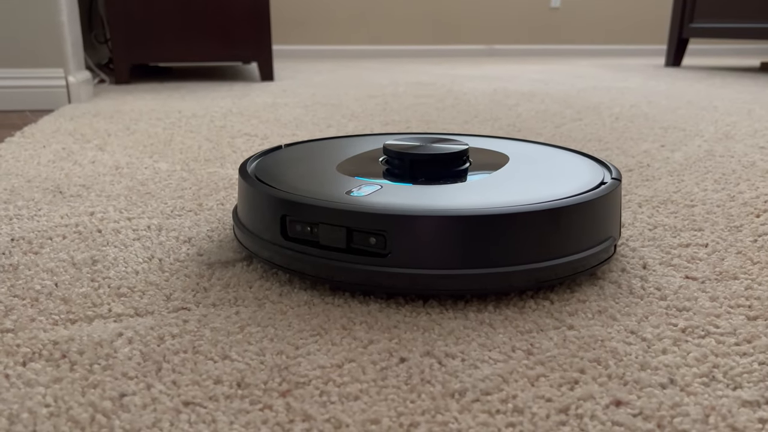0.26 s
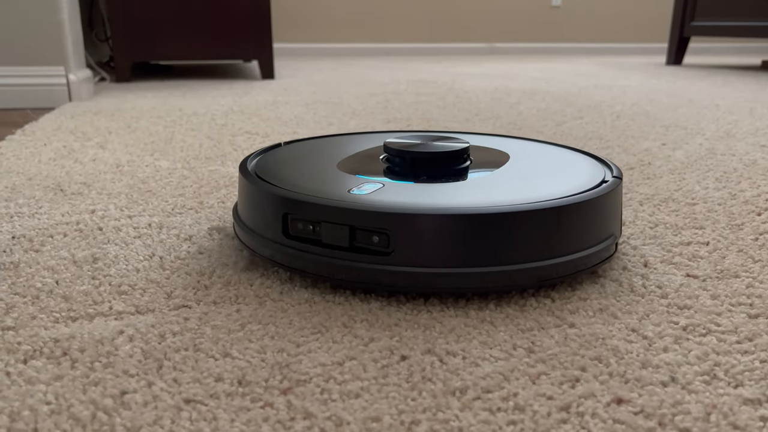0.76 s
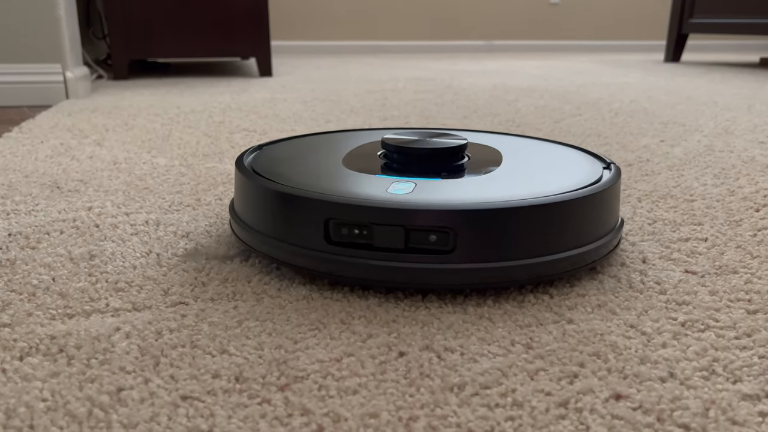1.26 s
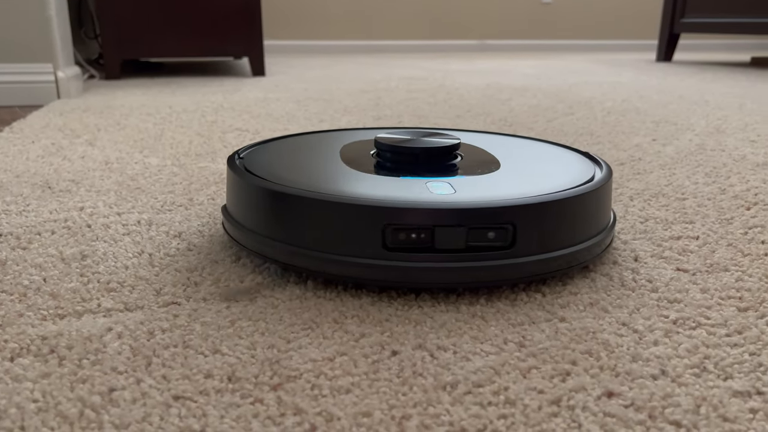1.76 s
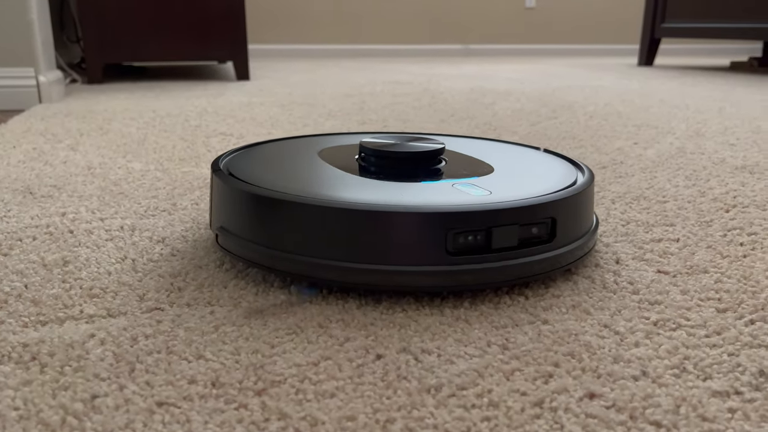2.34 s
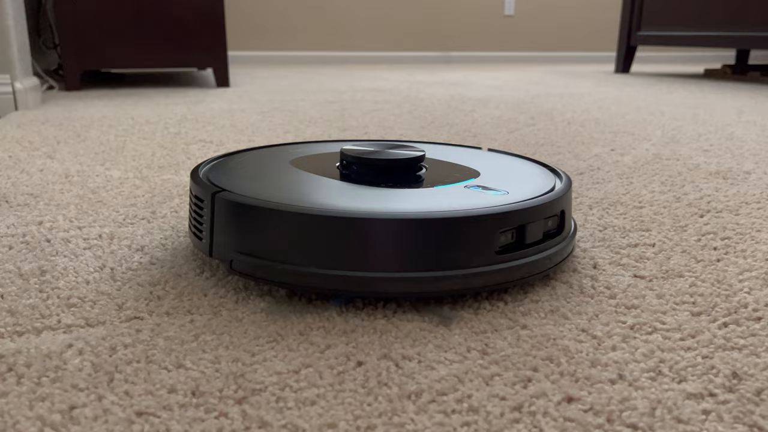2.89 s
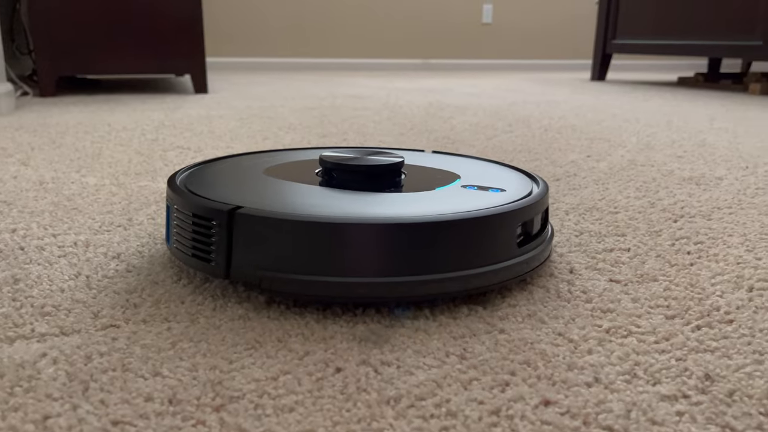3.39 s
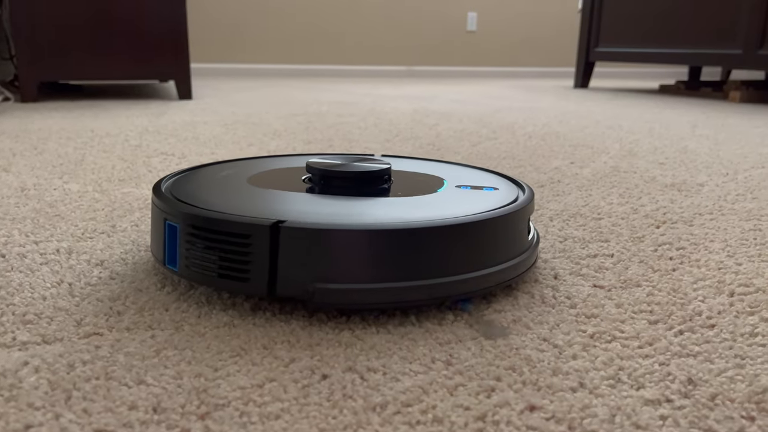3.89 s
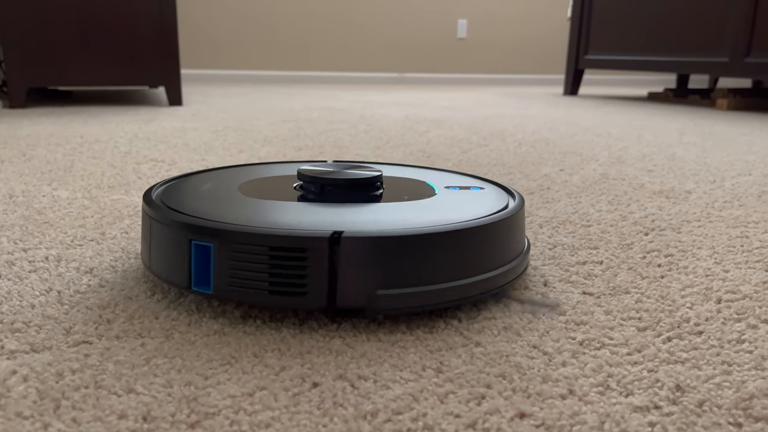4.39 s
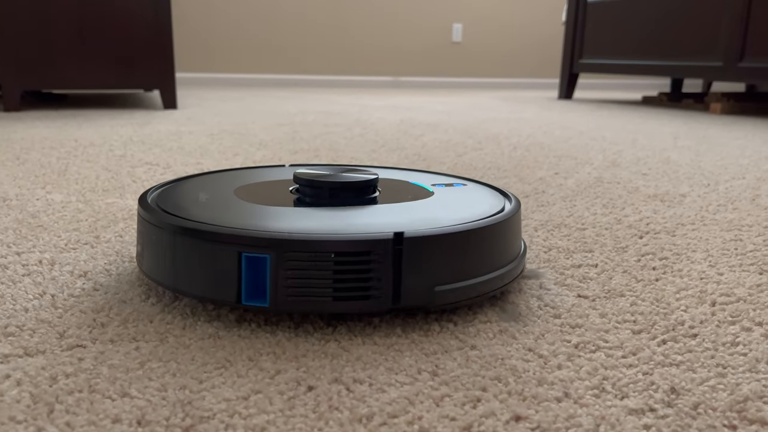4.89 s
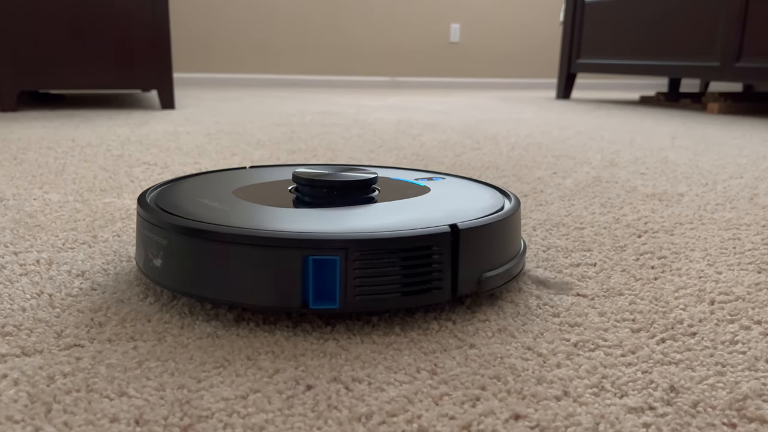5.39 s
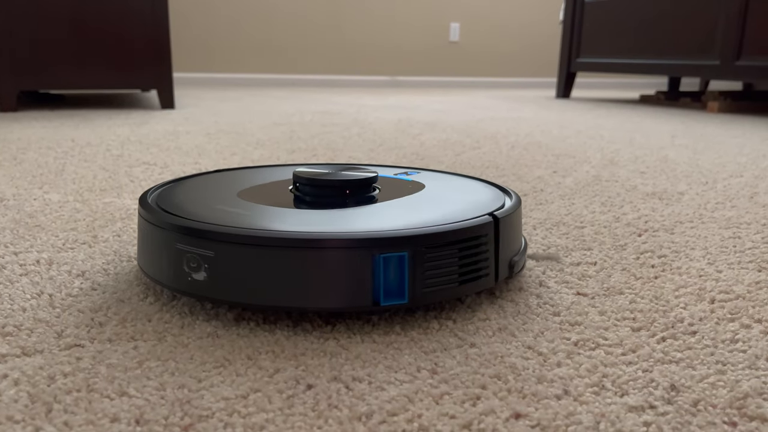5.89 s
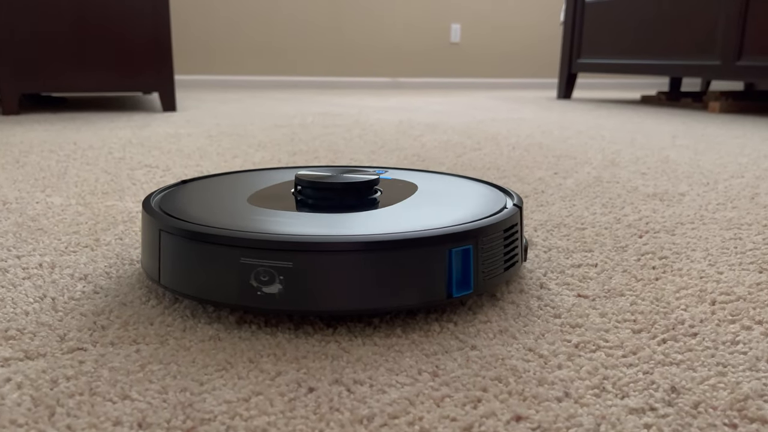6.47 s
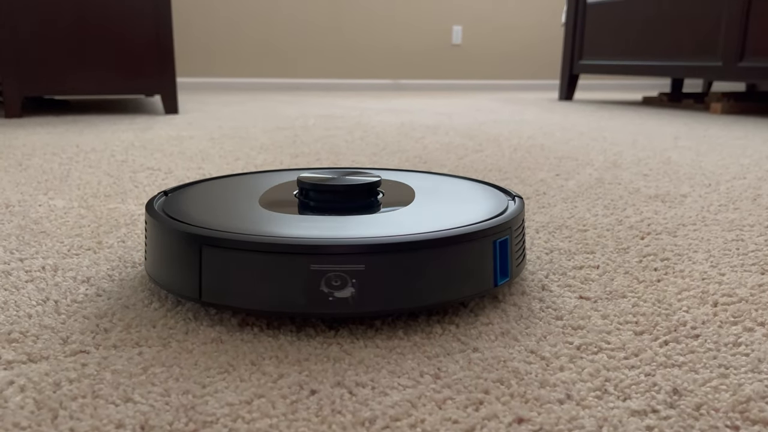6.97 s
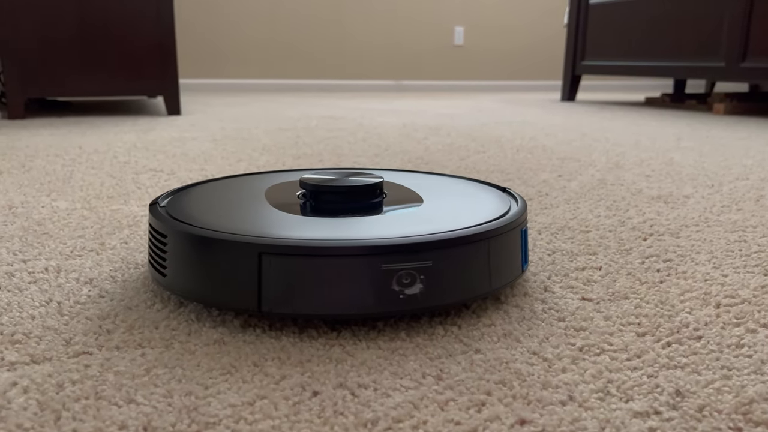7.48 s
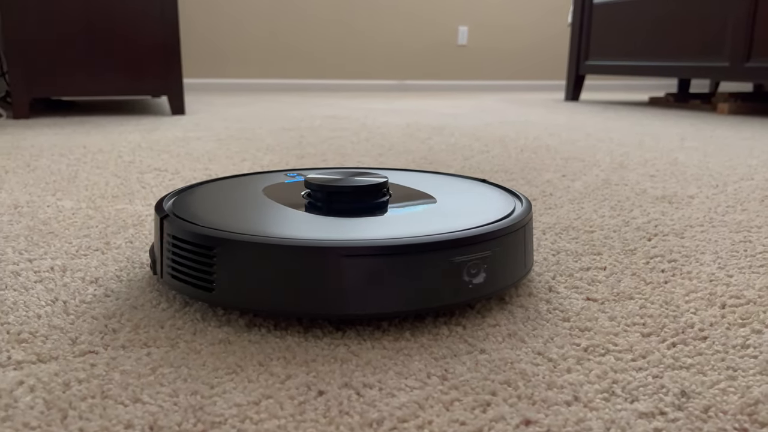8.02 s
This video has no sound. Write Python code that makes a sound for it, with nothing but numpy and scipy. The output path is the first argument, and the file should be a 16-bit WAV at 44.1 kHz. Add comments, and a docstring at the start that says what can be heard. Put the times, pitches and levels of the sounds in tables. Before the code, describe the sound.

Continuous motor noise from a small robot vacuum, close to a stereo microphone in a carpeted room. The roller and wheels give a dull, slightly uneven rumble; ducts give a hollow, breathy hiss; the fan holds a high whine with a faint octave above. Tone colour shifts slowly as the machine turns. Faint bumps and an early tiny tick occur, then the exhaust swings round and airflow grows fuller and stronger near the end.

```python
"""Robot vacuum turning on carpet

A robot vacuum turns slowly on the spot, close by, in a quiet living room; it grows louder as the
exhaust comes round. Brush roller and wheels rumble (shaped noise), the fan whines (beamed sines),
air rushes in ducts and vents (resonant noise in beams that sweep past). A crumb ticks, wheels thud.
"""
import sys
import numpy as np
from scipy import signal
from scipy.fft import rfft, irfft, next_fast_len
from scipy.io import wavfile
from scipy.ndimage import uniform_filter1d

SR = 44100
rng = np.random.default_rng(int(sys.argv[2]) if len(sys.argv) > 2 else 0)


def log_audio(samples):
    """Write samples as a 16-bit WAV file to the path given in sys.argv[1]."""
    # one column per channel
    frames = np.atleast_2d(samples).T
    # limit to full scale, then quantise
    limited = np.clip(frames, -1, 1)
    pcm = np.round(limited * 32767).astype(np.int16)
    wavfile.write(sys.argv[1], SR, pcm)


N = 363825
TIME = np.arange(N) / SR
SIZE = next_fast_len(N, real=True)
FREQ = np.maximum(np.arange(SIZE // 2 + 1) * SR / SIZE, 1)

# Facing: heading at which a part faces the listener. Levels are base levels, before scene() trims.
# Where the nose points: t/s, heading away from the listener/deg
HEADING = [(0, -54.5), (8.25, 224.5)]
# Air resonances of ducts and vents: f/Hz, width/Hz, level/dB per Hz, facing/deg, beam width/deg,
# slide/Hz per deg, left-right/dB, left lead/ms
VENTS = [(497, 143, -70.5, 211.5, 27.5, -1.66, -23.5, 0.43), (458, 76, -67, 44, 61, 0.0, -7, 0.087),
         (501, 107, -58.5, -19.0, 40.5, 0.1, -1, 0.48), (520, 188, -63, 252.0, 77, -0.27, 1.5, 0.65),
         (582, 153, -56.5, 240.5, 21.8, -0.46, 0.5, 0.54), (566, 137, -63.5, 63.0, 33.3, -0.47, 3.5, 0.044),
         (770, 110, -74, -45, 50, 0, 0, 0.64), (697, 110, -71, 178, 22, -0.6, 7, 0.3),
         (888, 40, -67, 106, 26, 0, -9, 0.17), (898, 237, -69, 189.0, 45.6, -0.5, 15.5, -0.11),
         (938, 166, -70, -22, 52, -0.0, -11, 0.77), (987, 167, -59.5, 216.0, 22.7, -1.2, 3.5, -0.12),
         (1087, 128, -66, 160.5, 33.6, 1, 2.5, -0.0069), (1170, 145, -71, -80.5, 38, -0.5, -14, 0.17),
         (1332, 99, -75, 87.0, 56, 2.0, -11, 0.25), (1410, 54, -63, 230, 46.6, -1, -7, 0.2),
         (1486, 130, -64, 193.0, 40, -3.5, -0.3, 0.292), (1677, 190, -61.5, 235.0, 22.6, -4, 3, -0.011),
         (1977, 220, -61.5, 189.5, 23.4, -2, -3, -0.0026), (2050, 380, -69, 212, 43, -4, -10, -0.17),
         (2230, 370, -64, 158.5, 31.3, 5, -2, -0.038), (2360, 1310, -67, -41.0, 35, -4.5, -8.5, -0.147),
         (2370, 210, -56, 225.5, 15, -4, 1, 0.048), (2484, 160, -62.5, 185, 18, 0, -2, 0.07),
         (2400, 205, -64, -32, 73, -0.03, -10, -0.1), (2451, 44, -59, 25, 78, 0.5, -5.5, -0.1),
         (2390, 870, -64.5, 62.0, 20.4, 2.5, -2, 0.04), (2430, 150, -59.5, 74, 10.6, 0.5, -6, 0.018),
         (2640, 940, -66, 236, 46, 1.36, 1, 0.148), (2760, 77, -71, -12.5, 36, 0.5, -20, -0.068),
         (2950, 110, -63.5, 240, 26, -3, 11, 0.22), (3400, 890, -72.5, 10.0, 61, -4.5, -7.5, -0.119),
         (3420, 950, -78, 215, 37, -0.5, -3.5, 0.145), (4000, 440, -75, -46.0, 64, -0.08, -15, 0.032),
         (4535, 440, -69, 200.0, 40.2, 0, -5, 0.02), (5380, 340, -68.5, 205, 32, -1.5, -8, 0.063),
         (5620, 2500, -70.5, 234.0, 31.6, 12, 1, -0.039), (5900, 330, -82.5, 54.5, 50, -5, -18.5, -0.08),
         (6930, 1330, -76, 252.0, 53, 7, -10.5, 0.041), (6880, 2070, -79.5, -86, 85, -0.53, -1, 0.04),
         (7920, 280, -82.5, 92.5, 21, -0.5, -6, 0.0), (8040, 260, -75.5, 208.5, 22, 6, 0, -0.003),
         (8280, 330, -78.5, -80.5, 51.5, -1.9, -11, -0.087), (9390, 285, -78, 238, 48, 1.3, 0, 0.005),
         (8680, 250, -83.5, -40, 63, 0, -6, -0.005), (12000, 1900, -73, 250, 31.3, -6, 0, -0.0984),
         (11900, 890, -82.5, -86.5, 69, -1.5, 0, 0.0086)]
# Paths round the shell that cancel or reinforce: f/Hz, width/Hz, strongest heading/deg, span/deg,
# slide/Hz per deg, left/dB, right/dB
INTERFERENCE = [(375, 85, -40, 33, 0.5, -2.5, 4), (410, 40, 69, 22, -0.5, 7, 2.5),
                (442, 45, 158, 55, -0.3, 7.5, 0.5), (466, 48, 10, 34, 0.1, -4.5, -1.5),
                (520, 65, 137, 26, -1.2, -3, -0.5), (592, 55, -33, 20, 1.1, -0.5, -6),
                (620, 74, 105, 18, -2.5, -5, 6.5), (640, 70, -50, 18, 0.5, -7.5, -0.5),
                (680, 110, 226, 16, -1, -2, -7), (654, 84, 64, 19, -0.5, 2, 4),
                (740, 71, 115, 25, -1, -5, -7), (835, 68, -23, 19, -2.5, 1, 4.5),
                (935, 70, -23, 10, 1, -5, -3), (940, 55, 61, 17, -2, -3, -5.5),
                (1130, 110, -45, 23, -2, 1, -1.5), (1110, 170, 219, 11, -5, -14, 6),
                (1260, 70, 221, 16, 1, -5, 3.5), (1350, 120, 190, 8.7, -3, 4, 3),
                (1410, 80, -32, 15, 5, -1, 4.5), (1435, 43, 216, 14, 1.5, 5, -9),
                (1520, 49, 209, 16, -3, 6, 6), (1700, 38, -43, 23, 0, -4.3, -3),
                (1740, 130, 165, 20, -3, 1, -4.5), (1860, 90, 53, 23, 1.5, -13, -8),
                (1930, 82, 225, 53, -5, -10, 2), (1950, 55, -12, 46, 0.5, 5, 1),
                (2040, 60, -35, 20, -0.5, 1, -6), (2090, 73, -41, 64, 0.5, -9, -3.5),
                (2230, 110, 138, 22, 3, -8, -3), (2180, 150, 231, 27, -8.5, 4, 2),
                (2550, 89, -41, 14, 5, 9, -6), (2790, 130, -50, 24, -3, -8, -0.5),
                (2800, 230, 76, 19, 12, -5, -4), (2940, 87, 36, 15, 3, 0, -5), (2670, 63, 62, 24, 0, 0, -1),
                (3040, 138, 200, 30, 5, -7, 1), (3300, 110, 170, 23, -7, -7, 1.5),
                (3270, 300, 57, 34, 1, 1, 0), (3570, 350, -38, 33, -12, -3, -2.5),
                (3450, 580, 205, 29, 1, -1, -3), (3870, 150, 134, 11, 0, 6, 5),
                (3850, 150, 2, 34, 0, 2, -0.5), (4140, 130, 160, 20, 7, -4, -3),
                (4600, 250, -10, 25, 3, 3, -0.5), (4870, 250, 188, 14, 5, -4, 0),
                (5380, 220, 212, 17, 0, -10, 0.5), (5830, 330, 165, 22, 7, 2, 1),
                (6500, 240, 212, 29, 9, -1.5, -5), (6600, 700, -25, 40, 0, 0, 0),
                (7100, 430, 166, 18, -9, 3, -1), (8470, 560, 189, 49, 4, 6.5, 7.5)]
# Air noise scattered by the room: f/Hz, level/dB per Hz
ROOM_AIR = [(40, -102), (100, -80.5), (170, -67.5), (270, -64.5), (420, -84), (700, -90.5), (1200, -76),
            (1800, -77), (2450, -72), (3300, -76.5), (4500, -90), (6000, -82.5), (8000, -118), (13300, -92)]
# Blade tone beams: facing/deg, beam width/deg, left/dB, right/dB, left lead/ms
WHINE_BEAMS = [(-36, 15, -41.5, -43, -0.27), (-11, 11, -41, -60, -0.25), (20, 8, -55, -43, -0.024),
               (49, 14, -45.5, -38, -0.03), (71, 14.5, -51, -34.5, 0.019), (103, 8.7, -43, -42.5, 0.089),
               (124, 8, -54, -41, 0.028), (143, 4.6, -56, -42, 0.12), (174, 6.5, -41, -36.5, 0.081),
               (199.5, 10, -34.5, -36, 0.097), (215, 6.5, -48, -36, 0.069)]
# Beams of the blade tone's octave: facing/deg, beam width/deg, left/dB, right/dB, left lead/ms
OCTAVE_BEAMS = [(-46, 16, -63, -45, 0.04), (3, 9, -61, -50.5, -0.012), (43, 6.5, -62, -53.5, -0.03),
                (81, 7, -64, -52, 0.069), (101, 5.1, -59, -47, 0.045), (129, 5.5, -62, -57, -0.04),
                (173, 8, -58, -47, 0.1), (197, 8, -51, -46, 0), (222, 6, -52, -42, -0.01)]
# Weaker fan lines: multiple of rotor rate, left/dB, right/dB, facing/deg, beam width/deg
FAN_LINES = [(1, -55.5, -48, 60, 190), (6, -64, -56, -85, 69), (7, -53, -42, -28, 24),
             (7, -52, -59, 150, 56), (24, -63, -66, -50, 35), (24, -63, -59, 183, 12)]
# Roller brush and drive on carpet: f/Hz, level/dB per Hz
RUMBLE = [(20, -92), (32, -83), (45, -72), (60, -71.5), (92, -70), (115, -63.5), (145, -62), (175, -60.5),
          (198, -61), (225, -60), (255, -65.5), (300, -67.5), (380, -85.5), (520, -103)]
# Low resonances of shell and room: f/Hz, width/Hz, lift/dB
BOOMS = [(58.5, 8, 8), (69.6, 9, -1), (80, 7.4, 6.5), (154.8, 8.5, 6), (181, 11.6, 9), (201.4, 5.6, -4.5),
         (213, 6.7, -2), (216, 10.8, 6.5), (267, 15, 2), (284, 28, 3), (303, 11, -2), (342, 8.6, 9.5),
         (360, 16, -3)]
# Roller heard more openly from the rear: facing/deg, beam width/deg, lift/dB
REAR = (204, 24, 1.2)
# Roller drive drone from one flank: f/Hz, width/Hz, level/dB per Hz, facing/deg, beam width/deg
DRONE = (184.5, 11, -55.5, 27, 29)
# Crumb flicked against the shell by the side brush: peak/dB, f/Hz, t60/s
CRUMB = (-31, 940, .025)
# Wheel dropping into the pile: t/s, peak/dB, f/Hz
THUDS = [(1.38, -36, 70.6), (2.865, -32.5, 73), (4.455, -35, 68), (6.635, -37, 76.6), (7.635, -38, 72)]
# Fixed peaks and dips at each microphone from nearby reflections: f/Hz, width/Hz, left/dB, right/dB
EAR_COLOUR = [(302, 24, -2, 2), (348, 22, 4.5, 0), (385, 45, -1, 4), (452, 80, -6, -1), (618, 60, 1, -4.5),
              (780, 130, 3, 3), (1050, 200, -1.5, -1), (1370, 110, 2.5, 0.5), (4000, 250, 3.5, 0),
              (7900, 900, 2, 1)]

FAN_START_HZ, FAN_CREEP_HZ_PER_S, BLADES = 322.93, 0.03, 8
CRUMB_AT_S = 1.066
THUD_RISE_S, THUD_T60_S = 0.023, 0.14
CUTOFF_HZ = 13313


def from_db(db):
    """Decibels to gain."""
    return 10 ** (np.asarray(db) / 20)


def shape(points):
    """Gain over FREQ from (f/Hz, dB) points, straight on a log frequency axis."""
    hz, db = np.transpose(points)
    return from_db(np.interp(np.log(FREQ), np.log(hz), db))


def resonance(hz, width_hz, freq=FREQ):
    """Bell of height 1 with steep skirts: a resonance passed twice."""
    detuning = (freq ** 2 - hz ** 2) / (freq * width_hz)
    return 1 / (1 + detuning ** 2)


def beam_gain(off_axis_deg, width_deg):
    """Gain of a beam that points so many degrees past the listener."""
    return np.exp((np.cos(np.radians(off_axis_deg)) - 1) / (2 * np.radians(width_deg) ** 2))


def turbulence(gain):
    """Complex random noise, gain per root Hz; two rows of gain give two ears."""
    white = rng.standard_normal(len(FREQ)) + 1j * rng.standard_normal(len(FREQ))
    return np.fft.ifft(white * gain * np.sqrt(SR * SIZE), SIZE)[..., :N]


def noise(gain):
    """Real part of turbulence: its sound pressure."""
    return turbulence(gain).real


def drift(rate_hz):
    """Slow random swing, mean 0, spread 1."""
    slow = noise(1 / (1 + (FREQ / rate_hz) ** 2))
    return (slow - slow.mean()) / slow.std()


def evened(x, seconds):
    """Noise with its own slow swells taken out."""
    power = np.mean(np.atleast_2d(x) ** 2, axis=0)
    return x * np.sqrt(power.mean() / uniform_filter1d(power, int(seconds * SR)))


def ears(pan_db, lead_ms):
    """Left and right response for a level difference and a head start of the left."""
    half = from_db(pan_db / 2) * np.exp(1j * np.pi * FREQ * lead_ms / 1000)
    return np.array([half, 1 / half])


def ring(start_s, peak_db, hz, rise_s, t60_s):
    """A note that rises in a straight line and dies away exponentially."""
    age_s = np.clip(TIME - start_s, 0, 1)
    decay = from_db(-60 * np.maximum(age_s - rise_s, 0) / t60_s)
    envelope = np.minimum(age_s / rise_s, 1) * decay
    return from_db(peak_db) * envelope * np.sin(2 * np.pi * hz * age_s)


def standing_waves(ripple_db, spacing_hz):
    """Reflections from walls and furniture: fine, fixed, random peaks and dips over frequency."""
    knots = rng.standard_normal(4000)
    gain = from_db(ripple_db * np.interp(FREQ / spacing_hz, np.arange(len(knots)), knots))
    return gain / np.sqrt(np.mean(gain ** 2))


def vents(heading_deg, level_db, colour):
    """Turbulent air rings in each duct; its opening beams it outward and turns with the shell."""
    out = np.zeros((2, N))
    for hz, width_hz, db, facing_deg, beam_deg, slide_hz_per_deg, pan_db, lead_ms in VENTS:
        off_axis_deg = heading_deg - facing_deg
        aim = beam_gain(off_axis_deg, beam_deg)
        # path lengths round the shell change as it turns: the peak slides
        slide_rad = np.float32(2 * np.pi * np.cumsum(slide_hz_per_deg * off_axis_deg) / SR)
        gain = from_db(db) * resonance(hz, width_hz) * colour * ears(pan_db, lead_ms)
        rush = turbulence(gain)
        out += aim * (np.cos(slide_rad) * rush.real - np.sin(slide_rad) * rush.imag)
    return out * from_db(level_db)


def room_air(level_db, direct_share):
    """Scattered air noise: a share reaches both ears alike, the rest differs at each ear."""
    gain = shape(ROOM_AIR)
    common, left, right = (noise(gain) for _ in range(3))
    direct = np.sqrt(direct_share) * common
    scattered = np.sqrt(1 - direct_share) * np.array([left, right])
    return from_db(level_db) * (direct + scattered)


def round_the_shell(air, heading_deg, size=2048):
    """Paths of changing length hollow out some bands and lift others, differently at each ear."""
    freq, frame_s, frames = signal.stft(air, SR, nperseg=size)
    freq = np.maximum(freq, 1)[:, None]
    turned_deg = np.interp(frame_s, TIME, heading_deg)
    colour_db = 0
    for hz, width_hz, facing_deg, span_deg, slide_hz_per_deg, left_db, right_db in INTERFERENCE:
        off_axis_deg = turned_deg - facing_deg
        bell = resonance(hz + slide_hz_per_deg * off_axis_deg, width_hz, freq)
        band = beam_gain(off_axis_deg, span_deg) * bell
        colour_db = colour_db + np.array([left_db * band, right_db * band])
    return signal.istft(frames * from_db(colour_db), SR, nperseg=size)[1][:, :N]


def beamed_tone(angle, hz, heading_deg, beams):
    """A tone at both ears: beams add in power, and their power-weighted lead delays the right."""
    power, weighted_lead_ms = 1e-12, 0
    for facing_deg, width_deg, left_db, right_db, beam_lead_ms in beams:
        ear_power = np.float32(from_db([[left_db], [right_db]]) ** 2)
        part = ear_power * beam_gain(heading_deg - facing_deg, width_deg) ** 2
        power = power + part
        weighted_lead_ms = weighted_lead_ms + beam_lead_ms * part.sum(axis=0)
    lead_ms = weighted_lead_ms / power.sum(axis=0)
    lead_rad = 2 * np.pi * hz * lead_ms / 1000
    return np.sqrt(power) * np.sin([angle, angle - lead_rad])


def fan(heading_deg, wobble, whine_db, octave_db, shimmer_db, octave_shimmer_db, fading_db, flutter_rad):
    """Lines at multiples of the rotor rate; they fade in and out as their beams sweep past."""
    rotor_hz = FAN_START_HZ + FAN_CREEP_HZ_PER_S * TIME
    angle = 2 * np.pi * np.cumsum(rotor_hz * (1 + wobble * drift(14.0))) / SR
    # intake eddies make the blade tone waver, the octave twice as much
    blade_angle = BLADES * angle + flutter_rad * drift(15)
    blade_hz = BLADES * rotor_hz
    whine = beamed_tone(blade_angle, blade_hz, heading_deg, WHINE_BEAMS)
    octave = beamed_tone(2 * blade_angle, 2 * blade_hz, heading_deg, OCTAVE_BEAMS)
    out = from_db(whine_db) * whine
    out += from_db(octave_db + octave_shimmer_db * drift(14)) * octave
    out *= from_db(shimmer_db * drift(15))
    for multiple, *levels_db, facing_deg, beam_deg in FAN_LINES:
        aim = beam_gain(heading_deg - facing_deg, beam_deg)
        for ear, db in enumerate(levels_db):
            line = np.sin(round(multiple) * angle + 0.73 * drift(0.91))
            out[ear] += aim * from_db(db + fading_db * drift(0.99)) * line
    return np.sqrt(2) * out  # table levels are rms


def rumble(heading_deg, split_hz, wheel_db, roller_db, wheel_sway_db, roller_sway_db, upper_pan_db):
    """Bristles beat the pile, wheels roll on it; both shake low resonances and sway with the pile."""
    boom_db = sum(db * resonance(hz, width_hz) for hz, width_hz, db in BOOMS)
    body = shape(RUMBLE) * from_db(boom_db)
    low_share = 1 / (1 + (FREQ / split_hz) ** 8)  # of power
    # long waves reach both ears alike, shorter ones lean to one side
    pan_db = np.interp(FREQ, [190, 330], [0, upper_pan_db])
    wheels = evened(noise(body * np.sqrt(low_share)), seconds=0.36)
    roller = evened(noise(body * np.sqrt(1 - low_share) * ears(pan_db, 0)), seconds=0.11)
    facing_deg, beam_deg, lift_db = REAR
    rear_db = lift_db * beam_gain(heading_deg - facing_deg, beam_deg)
    wheels = wheels * from_db(wheel_db + wheel_sway_db * drift(9.1))
    roller = roller * from_db(roller_db + roller_sway_db * drift(35) + rear_db)
    return wheels + roller


def drone(heading_deg):
    """Unsteady low note of the roller drive: narrow noise, strongest as its flank faces the listener."""
    hz, width_hz, db, facing_deg, beam_deg = DRONE
    note = evened(noise(from_db(db) * resonance(hz, width_hz)), seconds=0.48)
    return beam_gain(heading_deg - facing_deg, beam_deg) * note


def crumb():
    """One small tick of the plastic shell: a short decaying sine."""
    peak_db, hz, t60_s = CRUMB
    return ring(CRUMB_AT_S, peak_db, hz, rise_s=0.003, t60_s=t60_s)


def thuds():
    """Body bounces on its wheel springs: a low note swells quickly and dies in a few cycles."""
    return sum(ring(at_s, peak_db, hz, THUD_RISE_S, THUD_T60_S) for at_s, peak_db, hz in THUDS)


def scene():
    """Air, fan, roller and wheels of the turning machine, with a crumb and thuds."""
    heading_s, headings_deg = np.transpose(HEADING)
    heading_deg = np.float32(np.interp(TIME, heading_s, headings_deg))
    colour = standing_waves(ripple_db=2.2, spacing_hz=24.99)
    air = vents(heading_deg, level_db=0.55, colour=colour)
    air = air + room_air(level_db=-1.0, direct_share=0.14)
    air = round_the_shell(air, heading_deg)
    tones = fan(heading_deg, wobble=0.0001, whine_db=-1.0, octave_db=-0.5, shimmer_db=1.55,
                octave_shimmer_db=2.5, fading_db=0.5, flutter_rad=0.13)
    drive = rumble(heading_deg, split_hz=110, wheel_db=0.0, roller_db=-1.1, wheel_sway_db=1.3,
                   roller_sway_db=0.9, upper_pan_db=-1.5)
    return air + tones + drive + drone(heading_deg) + crumb() + thuds()


def record(dry):
    """Each microphone adds its own colour; the top is cut steeply."""
    colour_db = 0
    for hz, width_hz, left_db, right_db in EAR_COLOUR:
        colour_db = colour_db + np.array([[left_db], [right_db]]) * resonance(hz, width_hz)
    heard = irfft(rfft(dry, SIZE) * from_db(colour_db), SIZE)[:, :N]
    low_pass = signal.ellip(10, 0.1, 80, CUTOFF_HZ, fs=SR, output="sos")
    return signal.sosfilt(low_pass, heard)


dry = scene()
out = record(dry)
log_audio(out)
```